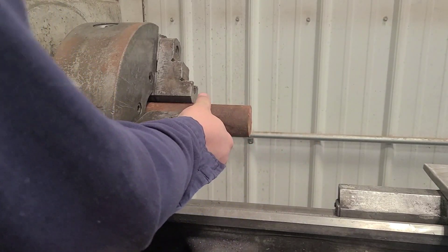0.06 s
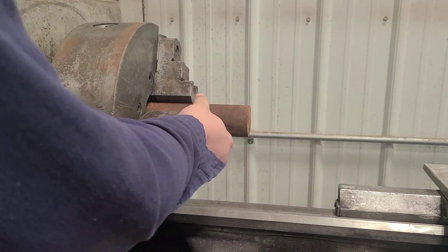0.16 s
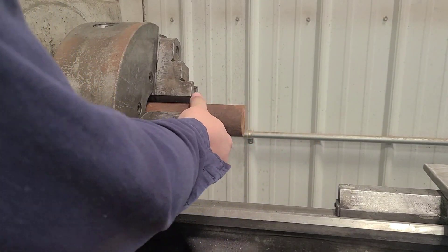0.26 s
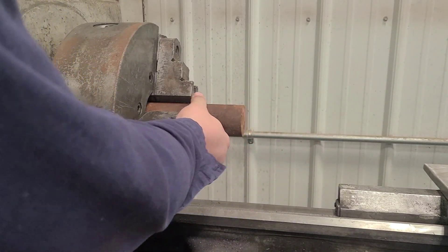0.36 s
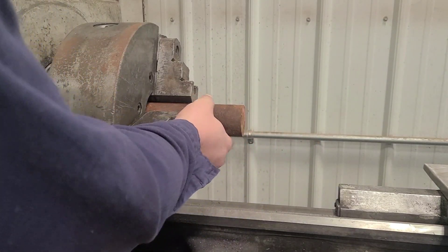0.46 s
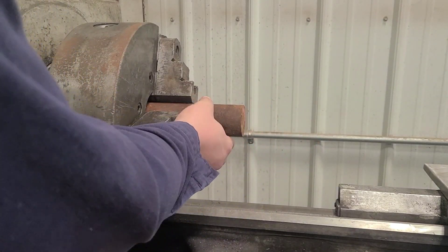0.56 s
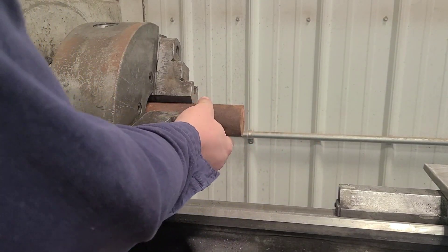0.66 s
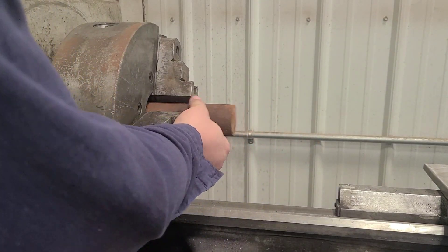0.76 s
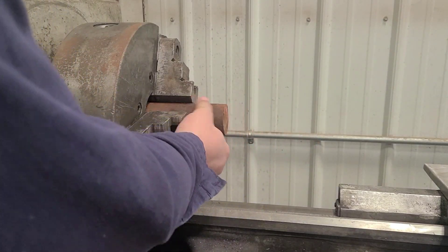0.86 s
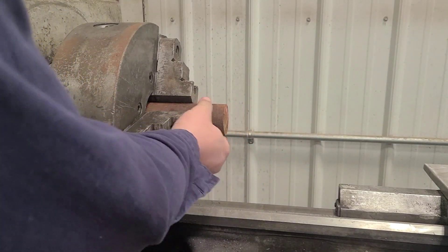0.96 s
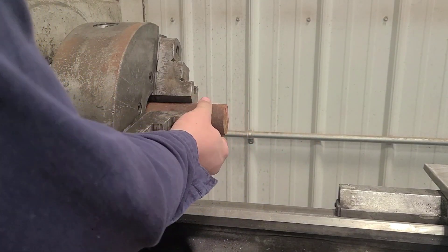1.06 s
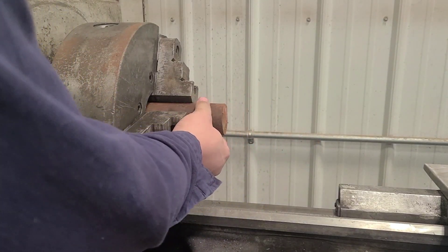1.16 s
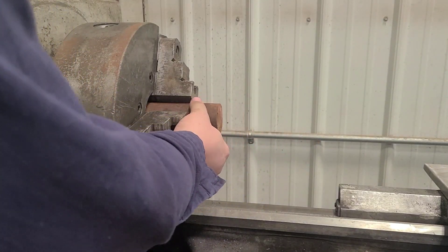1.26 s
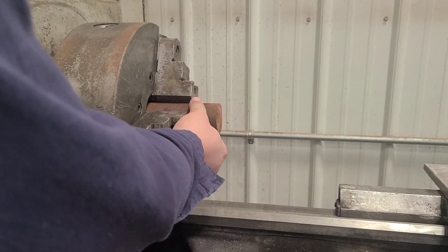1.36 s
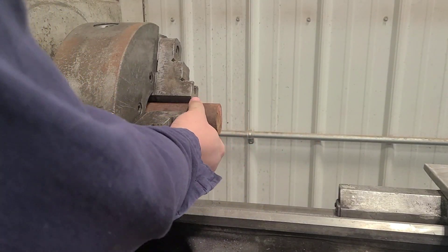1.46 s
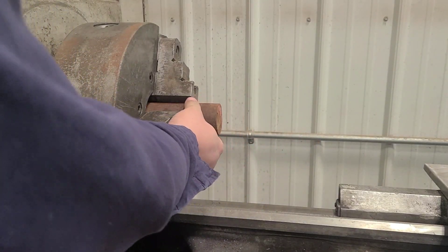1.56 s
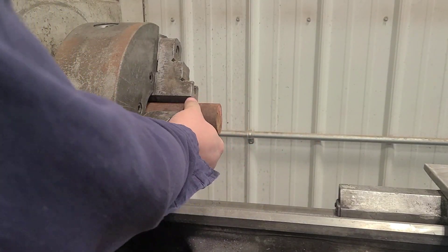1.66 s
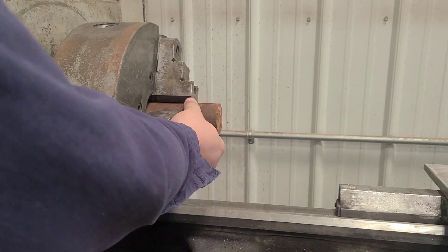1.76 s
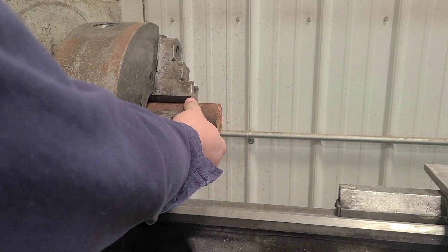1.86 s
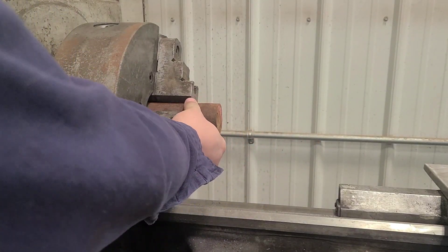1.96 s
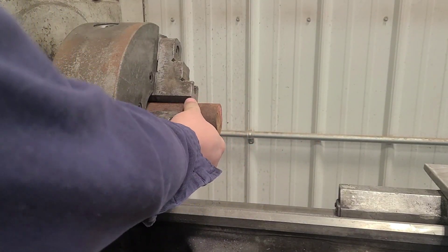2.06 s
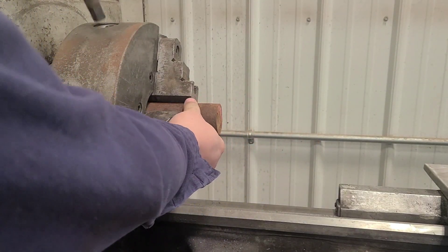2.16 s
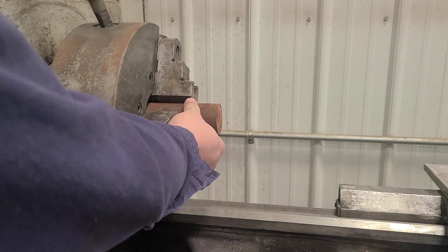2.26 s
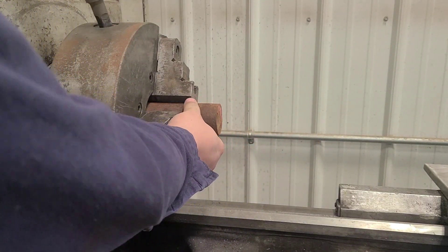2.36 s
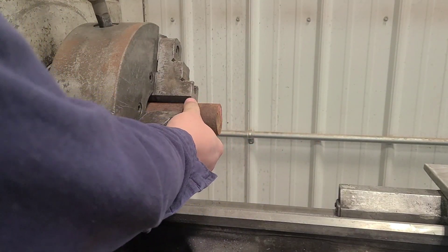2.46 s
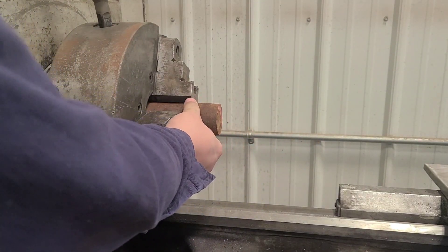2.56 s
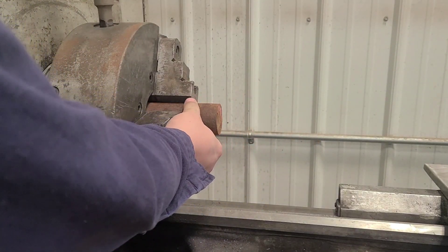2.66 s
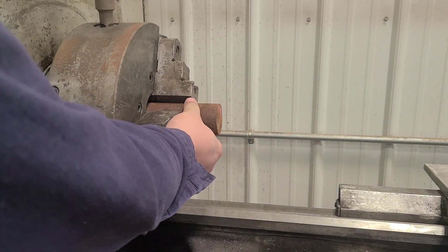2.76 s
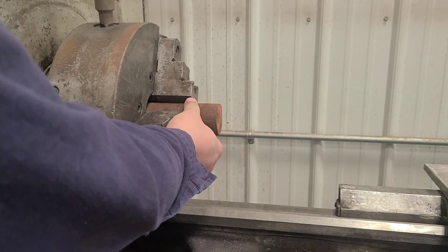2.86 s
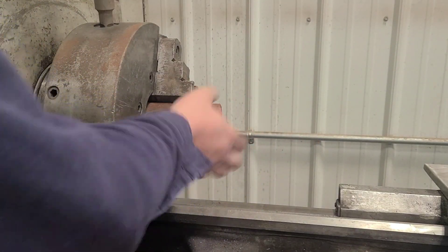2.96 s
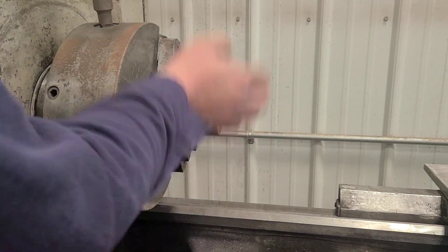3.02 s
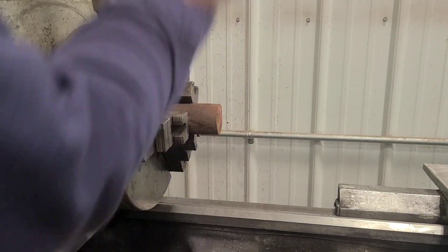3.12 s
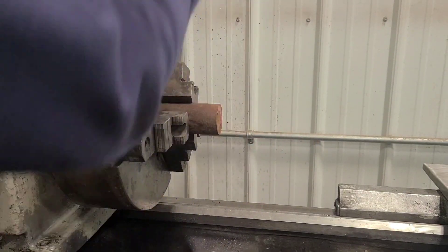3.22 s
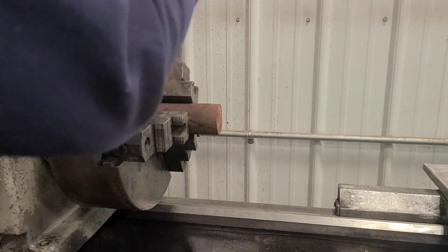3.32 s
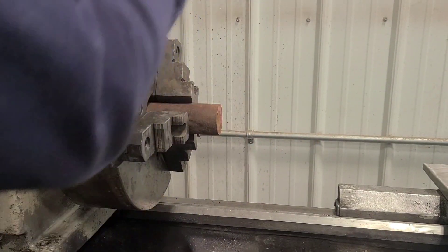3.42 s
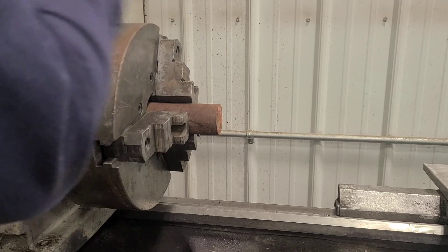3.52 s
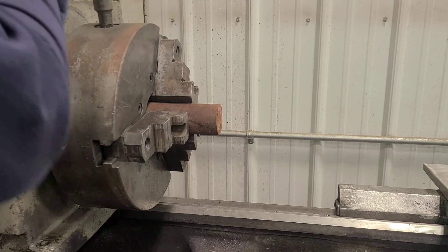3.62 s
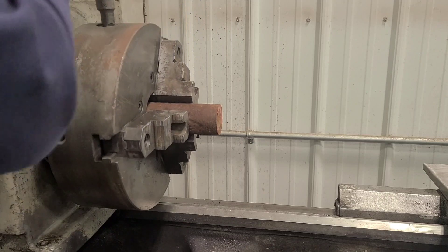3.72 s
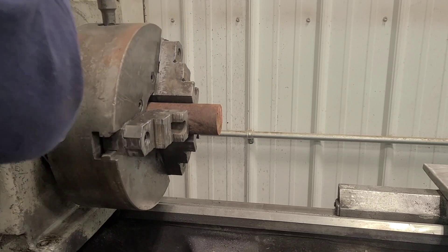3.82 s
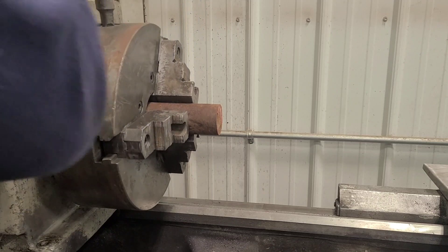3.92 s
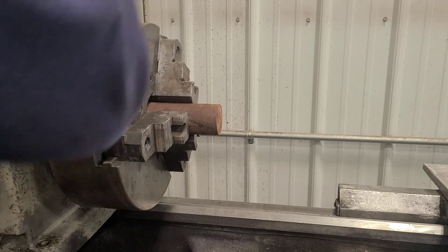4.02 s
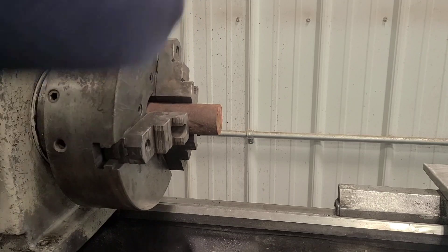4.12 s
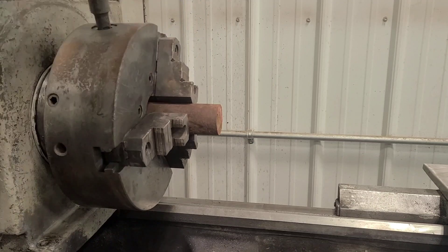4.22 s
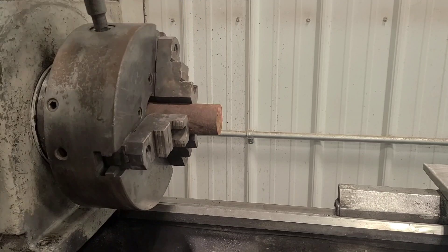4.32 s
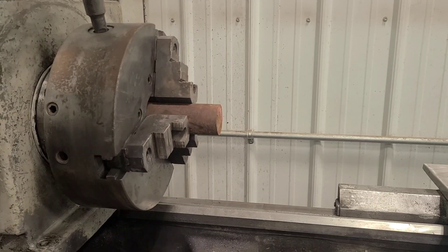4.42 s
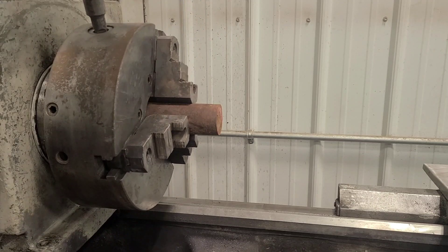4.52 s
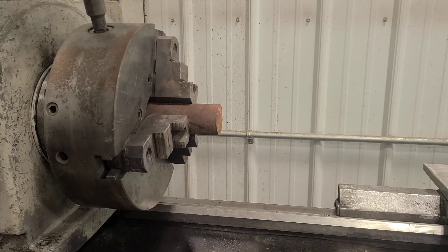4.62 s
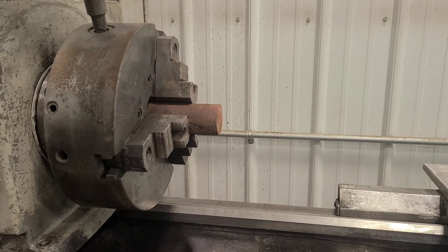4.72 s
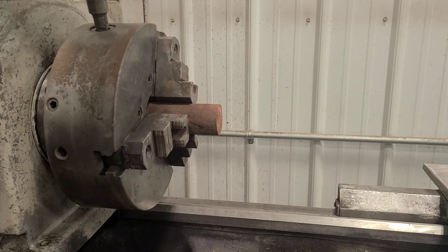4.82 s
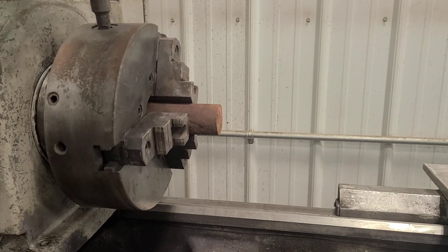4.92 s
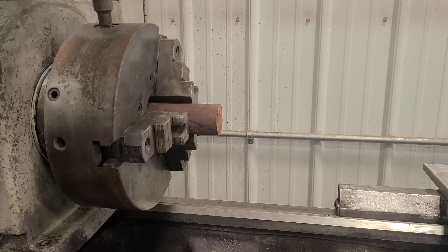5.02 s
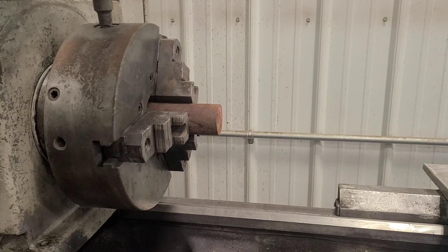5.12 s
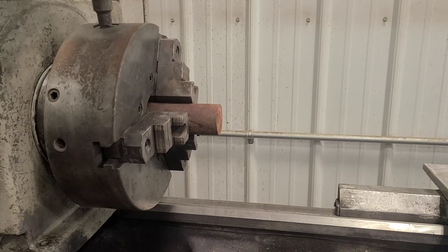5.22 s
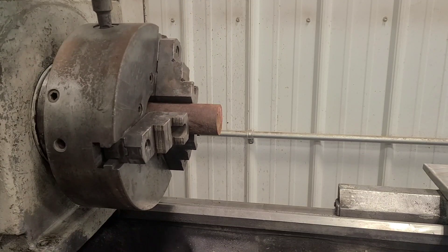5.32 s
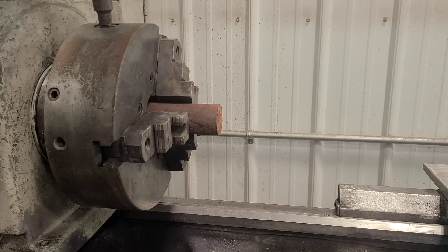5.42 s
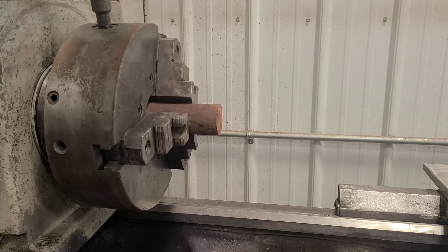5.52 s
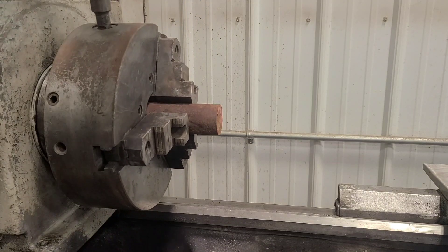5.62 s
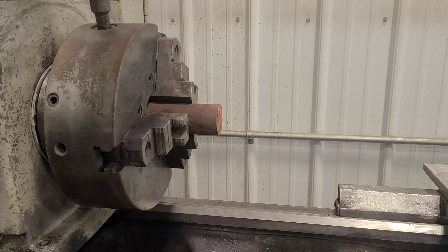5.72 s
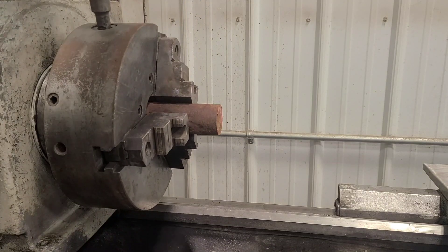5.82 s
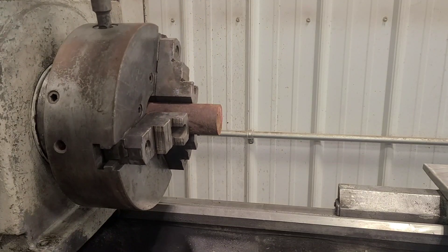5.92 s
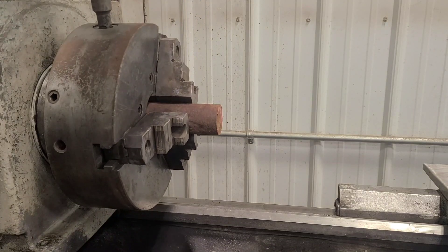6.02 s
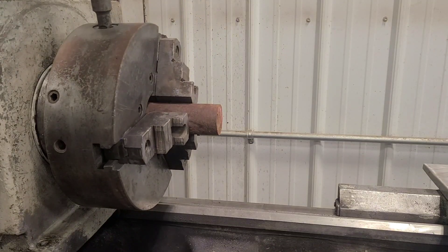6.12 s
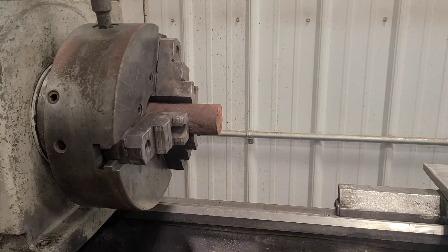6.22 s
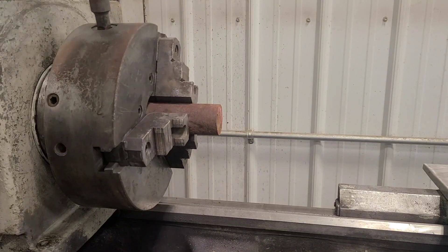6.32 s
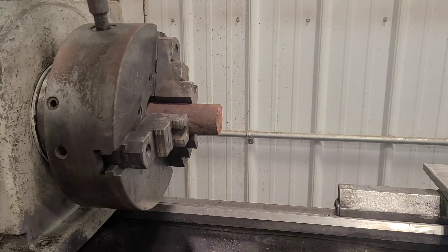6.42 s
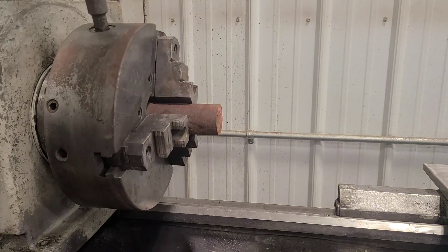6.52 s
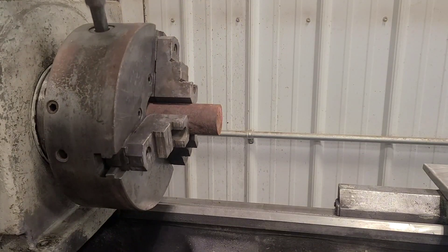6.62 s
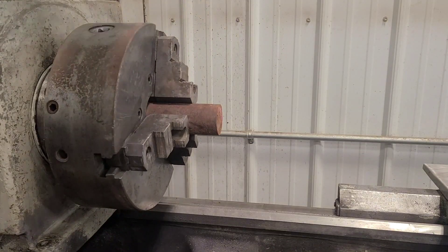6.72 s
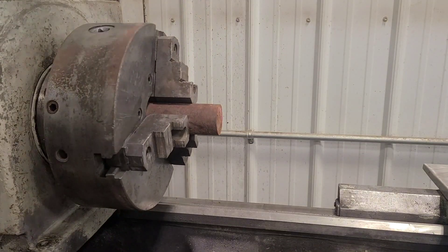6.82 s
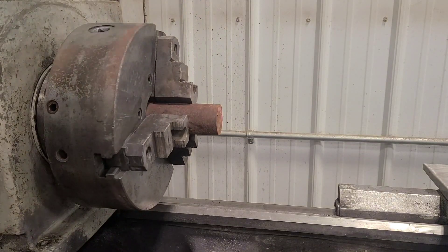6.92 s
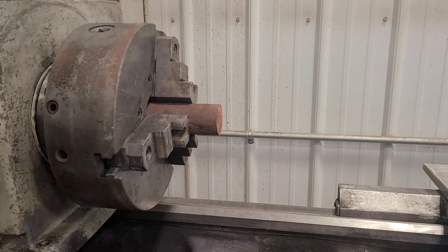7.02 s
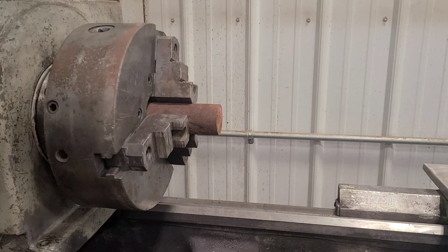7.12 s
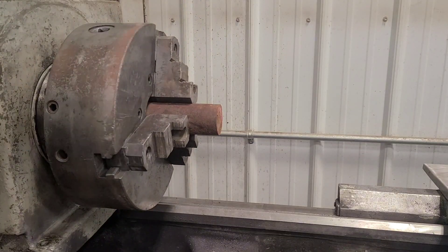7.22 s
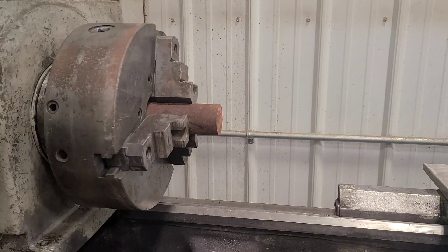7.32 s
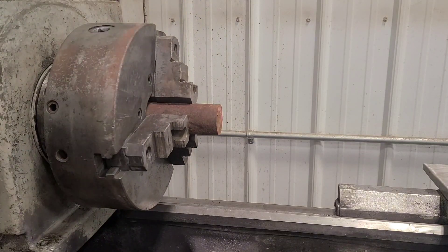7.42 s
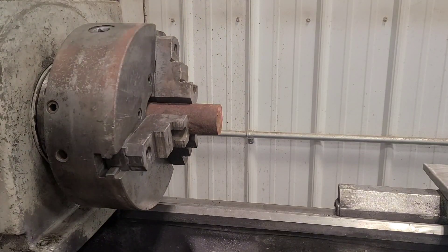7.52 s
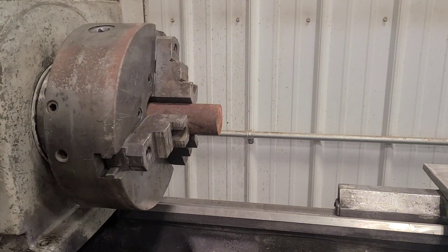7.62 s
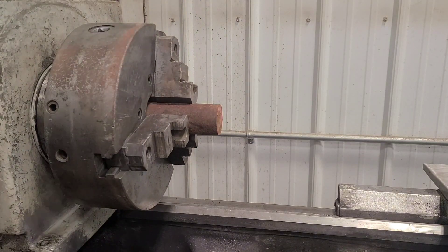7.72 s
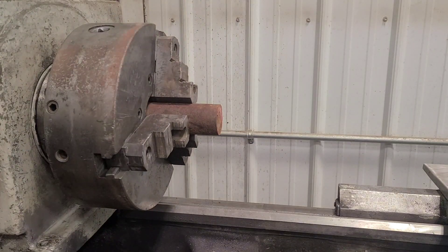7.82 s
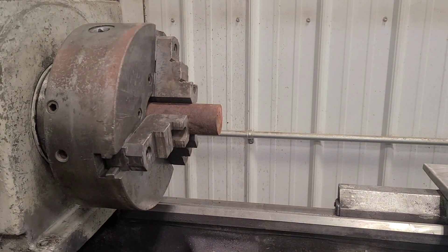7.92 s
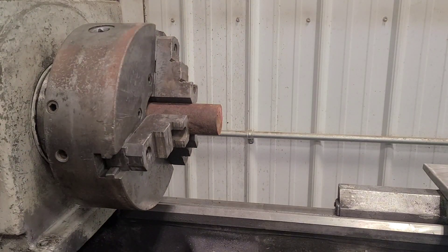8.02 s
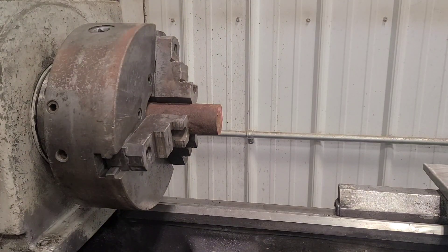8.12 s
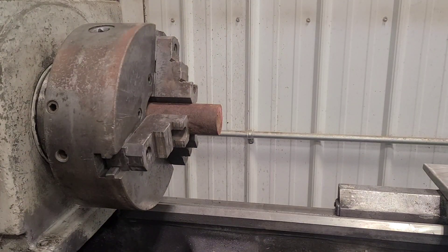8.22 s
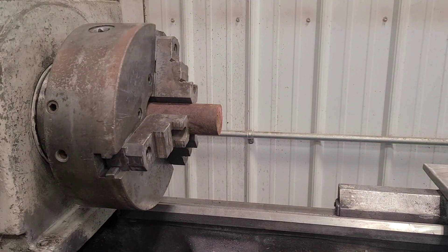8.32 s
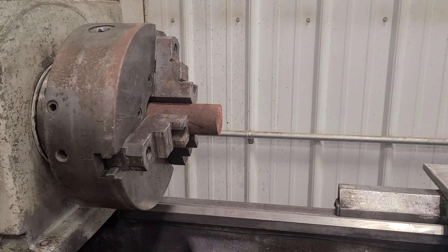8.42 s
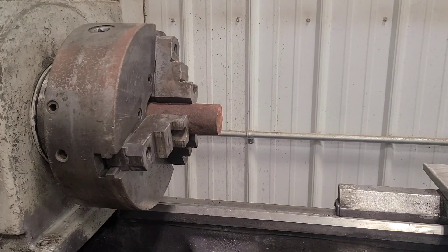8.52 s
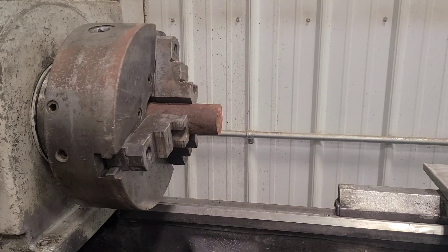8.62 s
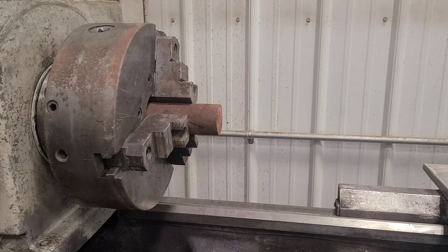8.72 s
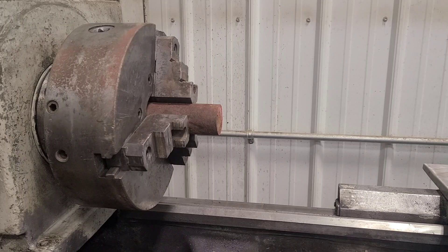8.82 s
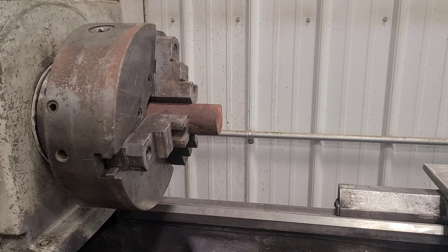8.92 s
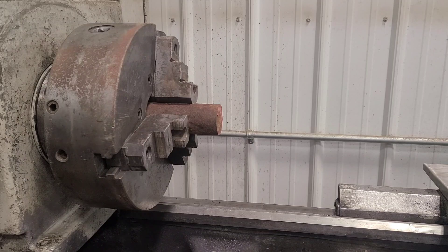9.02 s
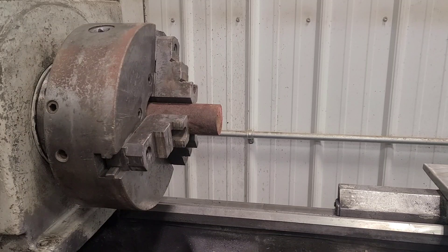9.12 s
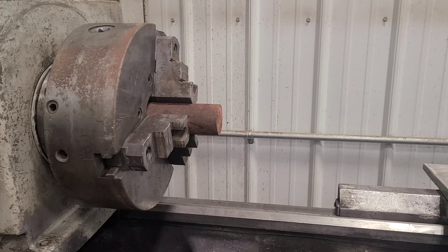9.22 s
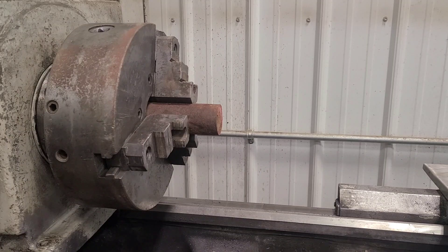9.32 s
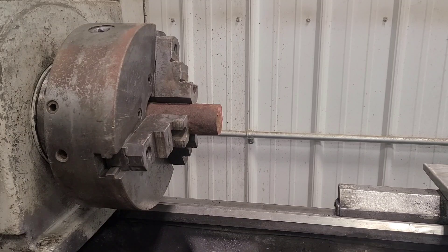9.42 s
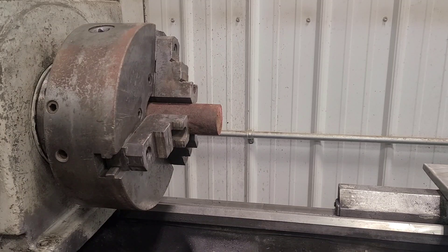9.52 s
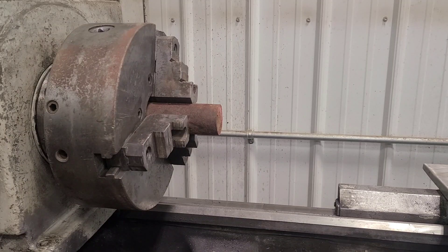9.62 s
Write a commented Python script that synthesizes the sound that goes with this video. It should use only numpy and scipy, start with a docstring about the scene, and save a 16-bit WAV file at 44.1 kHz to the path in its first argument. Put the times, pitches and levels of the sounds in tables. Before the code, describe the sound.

A steel bar clanks into a lathe chuck, clunks and small clicks follow as a key is worked, then a bright metallic crash on a tray.

```python
"""A low hum and the hiss of two microphone ports come first, with soft handling scuffs, in a tin-walled workshop.
Then a steel bar is slid into a lathe chuck, the jaws are tightened with a key, and the key drops on a steel tray;
near 9 s come duller knocks. Each blow is a crack of banded noise, dying sines for the struck part and a rough wash.
Jolts set the lathe bed humming, puffs of patchy noise come around some blows or like rustling sleeves elsewhere,
and sparse random taps make the room answer."""
import sys
import numpy as np
from scipy import signal
from scipy.fft import rfft, irfft, next_fast_len
from scipy.io import wavfile
from scipy.ndimage import uniform_filter1d

SR = 44100
rng = np.random.default_rng(int(sys.argv[2]) if len(sys.argv) > 2 else 0)


def bounce(signal):
    """Save signal as a 16-bit WAV file at the path given by the first command-line argument."""
    frames = np.transpose(np.atleast_2d(signal))
    limited = np.clip(frames, -1, 1)
    pcm = np.round(limited * 32767).astype(np.int16)
    wavfile.write(sys.argv[1], SR, pcm)


N = 426447

# How alike sound from all around is at the two ports. Each row: frequency in Hz, likeness from 0 to 1.
PORT_LIKENESS = [(30, 0.85), (200, 1), (700, 0.15), (2500, 0.17), (15000, 0.065)]
# Ringing modes of the chuck. Each row: frequency in Hz, relative level in dB, t60 in seconds.
CHUCK_MODES = [(460, -1, 0.23), (587, -7, 0.23), (867, -5, 0.077), (1007, 2, 0.037), (1510, 2, 0.018),
               (1683, 8, 0.03), (2060, -11, 0.11), (2312, 11.5, 0.033), (2460, 2, 0.33), (2550, 15, 0.03),
               (2630, -6, 0.34), (2860, 11.5, 0.033), (4216, 6.5, 0.04), (6000, 0, 0.035),
               (6450, -4, 0.098), (6920, 4.5, 0.066), (8620, -4.5, 0.038), (9400, -17, 0.028),
               (11900, -15, 0.037)]


def gain_of(db):
    """Amplitude factor of a level in dB."""
    return 10 ** (np.asarray(db) / 20)


def evened(x):
    """Scale a signal to an rms of 1."""
    return x / np.sqrt(np.mean(x ** 2) + 1e-20)


def read(points, hz):
    """Read a curve of (Hz, value) points along a logarithmic frequency axis."""
    f, value = np.transpose(points)
    return np.interp(np.log(hz + 1), np.log(f + 1), value)


def add(mix, s, sound):
    """Lay a sound into the mix at s seconds, cut at the end of the mix."""
    part = mix[..., round(s * SR):][..., :sound.shape[-1]]
    part += sound[..., :part.shape[-1]]


def band(x, low_hz, high_hz):
    """Keep one band of frequencies."""
    edges = [low_hz, min(high_hz, SR / 2.2)]
    return signal.sosfilt(signal.butter(4, edges, "bandpass", fs=SR, output="sos"), x)


def ports(x, lag_s, lean=0):
    """Sound reaches the right port a little later than the left; lean gives struck steel another colour there."""
    # How much louder struck steel is in the left port. Each row: frequency in Hz, difference in dB.
    left_lean = [(100, -5.5), (1300, 0), (2400, 2), (4400, 8.5), (8100, 7), (12000, 4.5)]
    size = next_fast_len(x.shape[1] + 64)
    hz = np.fft.rfftfreq(size, 1 / SR)
    tilt = gain_of(lean * read(left_lean, hz) / 2)
    right = np.exp(-2j * np.pi * hz * lag_s) / tilt
    return irfft(rfft(x, size) * [tilt, right], size)[:, :x.shape[1]]


def unlike(left, other, likeness):
    """Mix two independent spectra so that the ports are only partly alike."""
    return np.array([left, likeness * left + np.sqrt(1 - likeness ** 2) * other])


def noise(spectrum, patchy_db, size, likeness):
    """Random short-time spectra with drifting patches of level, partly alike in both ports."""
    frames, hz = N // (size // 4) + 5, np.fft.rfftfreq(size, 1 / SR)
    a, b, c, d, patches = rng.standard_normal((frames, len(hz), 5)).T
    patches = uniform_filter1d(patches, size=9, axis=0)
    patches = evened(uniform_filter1d(patches, size=9, axis=1))
    same = np.clip(likeness * read(PORT_LIKENESS, hz), -1, 1)[:, None]
    z = unlike(a + 1j * b, c + 1j * d, same)
    z *= gain_of(read(spectrum, hz)[:, None] + patchy_db * patches)
    return signal.istft(z, nperseg=size, noverlap=size * 3 // 4)[1][:, :N]


def air():
    """The still air of the workshop and the hiss of the microphone: steady shaped noise."""
    # Colour of the air and hiss. Each row: frequency in Hz, relative level in dB per Hz.
    air_colour = [(20, -21.5), (43, -12.5), (80, -5), (125, -26), (200, -26), (440, -29), (900, -31.5),
                  (2000, -34.5), (3000, -34.5), (6600, -42.5), (7400, -58), (9500, -51.5), (11800, -45.5),
                  (16000, -48.5)]
    level_db = -67  # of the part between 130 and 18000 Hz
    x = noise(air_colour, 0.12, size=2048, likeness=0.85)
    return gain_of(level_db) * x / band(x, 130, 18000).std()


def wavering(hz, width_hz):
    """A steady tone plus a narrow line of noise on it: height and phase wander."""
    r = np.exp(-np.pi * width_hz / SR)
    push = rng.standard_normal(N) + 1j * rng.standard_normal(N)
    slow = signal.lfilter([1], [1, -r], push)
    carrier = np.exp(2j * np.pi * hz * np.arange(N) / SR)
    return ((1 + 0.54 * slow / slow.std()) * carrier).real


def hum():
    """A low hum swells and fades, with fainter wavering tones above it, the highest a blurred narrow band."""
    # Swell of the hum. Each row: time in seconds, level in dB.
    swell = [(0.0, -52), (0.29, -61.5), (1.21, -52.5), (2.85, -59.5), (3.068, -59), (4.28, -66.5),
             (4.39, -60), (5.3, -60), (5.38, -90), (5.63, -60.5), (6.68, -57), (6.7, -68), (8.1, -62),
             (9.67, -67.5)]
    # Faint wavering tones. Each row: frequency in Hz, level in dB, line width in Hz.
    faint_tones = [(202, -81, 4.1), (117.6, -76.5, 2.3), (2590, -86.5, 71)]
    hum_hz, width_hz = 76.4, 2.2
    s, db = np.transpose(swell)
    out = gain_of(np.interp(np.arange(N) / SR, s, db)) * evened(wavering(hum_hz, width_hz))
    for hz, db, width in faint_tones:
        out = out + gain_of(db) * evened(wavering(hz, width))
    return out


def scuffs():
    """Heavy parts scuff and bump dully in handling: humps of gritty banded noise."""
    # Each row: peak of the hump in seconds, level in dB, seconds to fade to about half, centre in Hz.
    scuff_list = [(.08, -60.5, 0.076, 213), (0.461, -62.5, 0.062, 324), (1.061, -55, 0.1, 247),
                  (1.423, -64, 0.09, 220), (2.43, -38.5, 0.038, 463), (3.412, -54.5, 0.045, 284),
                  (3.908, -46.5, 0.049, 400), (4.041, -52.5, 0.033, 343), (4.154, -66, 0.044, 2260),
                  (4.417, -61.5, 0.13, 480), (4.422, -69, 0.23, 2170), (4.941, -53.5, 0.032, 358),
                  (5.047, -58.5, 0.036, 360), (5.421, -64, 0.035, 322), (5.708, -51, 0.056, 372),
                  (6.074, -63.5, 0.038, 327), (5.905, -66, 0.12, 2770), (5.992, -61.5, 0.079, 3380),
                  (6.484, -58, 0.051, 345), (6.887, -50.5, 0.03, 1220), (8.051, -40, 0.01, 556),
                  (9.141, -54.5, 0.011, 204)]
    rise_speed = 1.85  # times faster than the fade
    out = np.zeros((2, N))
    for s, db, length, hz in scuff_list:
        a, b, grit = rng.standard_normal((3, SR // 2))
        u = (np.arange(SR // 2) / SR - 1 / 4) / length
        hump = np.exp(-(0.85 * u * np.where(u < 0, rise_speed, 1)) ** 2)
        rough = np.array([a, a + 0.23 * b]) * gain_of(3.4 * grit)
        scuff = gain_of(db) * hump * evened(band(rough, hz / 1.49, hz * 1.324))
        early = max(round((1 / 4 - s) * SR), 0)  # samples that would fall before the start
        add(out, max(s - 1 / 4, 0), scuff[:, early:])
    return out


def ringing(modes, level_db, favoured_hz, spread_octaves, split_hz, apart, rise_cycles, wander):
    """Dying sines in beating pairs, strongest near the pitch the blow favours, with another phase in each port.

    Phases stray by about wander turns in every 10 ms, which roughens the ring."""
    silent_db, twin_db, twin_lasts = -95, -9, .22  # the twin is weaker but lasts this share longer
    hz, db, t60 = np.transpose(modes + modes)
    luck, phase, side = rng.standard_normal((3, len(hz)))
    twin = np.arange(len(hz)) >= len(modes)
    off_pitch = np.log2(hz / favoured_hz) / spread_octaves
    db = level_db + db + 0.73 * luck + twin_db * twin - 10 * off_pitch ** 2
    hz = hz + split_hz * twin * (1 + 0.24 * side)
    t60 = t60 * (1 + twin_lasts * twin)
    steps = wander * np.cumsum(rng.standard_normal((len(hz), 101)), axis=1)
    out = np.zeros((2, SR))
    for f, d, t6, p, sd, step in zip(hz, db, t60, phase, side, steps):
        t = np.arange(int(SR * np.clip((d - silent_db) / 60 * t6, 0, 1))) / SR
        turns = f * t + p + np.interp(t * 100, np.arange(101), step)
        attack = np.minimum(t * f / rise_cycles, 1)
        mode = gain_of(d) * attack * np.exp(2j * np.pi * turns - np.log(1000) * t / t6)
        out[:, :len(t)] += [mode.imag, (mode * np.exp(2j * np.pi * apart * sd)).imag]
    return out


def crack(burst, knock_db, clank_db, tick_db, t60, hard):
    """The instant of contact: noise in a low, a middle and a high band, duller for a light touch."""
    t = np.arange(len(burst)) / SR
    thud_filter = signal.butter(1, 1000, fs=SR)  # the knock falls off above this
    dull_filter = signal.butter(1, 3450 * (0.072 + 0.23 * hard), fs=SR)
    thud = evened(signal.lfilter(*thud_filter, band(burst, 460, 3600)))
    clank = evened(signal.lfilter(*dull_filter, band(burst, 1150, 6800)))
    tick = evened(band(burst, 6800, 15500))
    fall = gain_of(-60 * t / max(t60, .005)) * np.minimum(t / 0.0029, 1)
    return fall * (gain_of(knock_db) * thud + gain_of(clank_db) * (clank + gain_of(tick_db) * tick))


def blows(table, modes, apart, tick_db, wash_db, wash_t60, spread_octaves, split_hz, wander, lag_s, wash_s=0.5):
    """Each blow cracks, rings the modes of the part and leaves the dense rough wash of castings and sheet."""
    size = int(wash_s * SR)
    out, t = np.zeros((2, N)), np.arange(size) / SR
    # countless weak modes: an uneven spectrum shared by all blows on the part
    crowd = gain_of(2.0 * evened(uniform_filter1d(rng.standard_normal(size // 2 + 1), size=9)))
    for s, ring, knock, clank, hz, t60 in table:
        burst, left, right = rng.standard_normal((3, size))
        hard = np.clip((clank + 62.4) / 28, .07, 1)  # a light touch stirs few modes, a hard blow many
        add(out, s, crack(burst[:SR // 4], knock, clank, tick_db, t60, hard))
        wash = irfft(rfft([left, left + 1.5 * right]) * crowd)
        wash = evened(band(wash, 900, 5600)) * np.minimum(t / .015, 1)
        add(out, s, gain_of(clank + wash_db - 60 * t / wash_t60) * wash)
        add(out, s, ringing(modes, ring, hz, spread_octaves * hard, split_hz, apart, rise_cycles=2.2, wander=wander))
    return ports(out, lag_s, lean=1)


def jaw():
    """Blows on a chuck jaw: a few modes ring briefly."""
    # Each row: start in seconds, ring, knock and clank in dB, favoured mode in Hz, crack t60 in seconds.
    jaw_hits = [(.721, -37.5, -33.5, -40, 2500, 0.2), (.751, -49, -38, -26.5, 4500, 0.034),
                (.8, -53, -44, -47, 2500, 0.067)]
    # Ringing modes of the jaw. Each row: frequency in Hz, relative level in dB, t60 in seconds.
    jaw_modes = [(740, -3, 0.14), (1890, -16, 0.29), (2390, -8, 0.33), (3500, -14, 0.52), (4690, -14, 0.28),
                 (6150, -6, 0.21), (7810, -21, 0.2)]
    return blows(jaw_hits, jaw_modes, apart=0.17, tick_db=-19.0, wash_db=-21, wash_t60=0.53,
                 spread_octaves=6.8, split_hz=36, wander=0.26, lag_s=0.00025)


def puffs():
    """Short smooth puffs of patchy, mostly high noise, some around blows, others like rustling sleeves."""
    # Each row: middle in seconds, level in dB, length in seconds.
    puff_list = [(0.928, -55, 0.062), (2.847, -63, 0.074), (3.096, -65.5, 0.044), (3.39, -71, 0.28),
                 (4.44, -66.5, 0.52), (4.662, -69, 0.17), (5.09, -67, 0.15), (5.253, -70.5, 0.24),
                 (5.666, -68.5, 0.2), (5.99, -65, 0.35), (6.387, -72, 0.42), (6.88, -68, 0.59),
                 (7.069, -61, 0.087), (7.366, -65, 0.096), (7.467, -68.5, 0.075), (8.884, -67, 0.85)]
    # Colour of the puffs. Each row: frequency in Hz, relative level in dB per Hz.
    puff_colour = [(1500, -29), (3000, -4), (5000, -2), (7000, 0.5), (9000, -8.5), (12000, -3.5),
                   (15000, -1), (16000, -5.5)]
    t = np.arange(N) / SR
    swells = sum(gain_of(db) * np.exp(-(3.3 * (t - s) / length) ** 2) for s, db, length in puff_list)
    return swells * evened(noise(puff_colour, 1.6, size=256, likeness=0.3))


def bar():
    """Blows on the steel bar: its modes ring clear, with little wander of phase."""
    # Each row: start in seconds, ring, knock and clank in dB, favoured mode in Hz, crack t60 in seconds.
    bar_hits = [(.897, -64, -43.5, -64, 980, 0.064), (.923, -33.5, -15.5, -20, 2380, 0.024),
                (.954, -43, -37, -27, 7100, 0.031)]
    # Ringing modes of the bar. Each row: frequency in Hz, relative level in dB, t60 in seconds.
    bar_modes = [(520, 7, .09), (1012, -16, .25), (1733, -23, .35), (2530, -15, .6), (2803, 3.5, .58),
                 (3550, -13, .5), (4085, -13, .55), (4935, -15, .55), (6080, -20, .3), (6400, -14, .45),
                 (7680, -17, .5), (8100, -15, .45), (9740, -18, .3), (10200, -21, .25), (11660, -18, .15),
                 (12440, -21, .22), (13870, -26, .2)]
    return blows(bar_hits, bar_modes, apart=.08, tick_db=-22.0, wash_db=-23.5, wash_t60=0.58,
                 spread_octaves=19.0, split_hz=11.5, wander=0.06, lag_s=0.00021)


def bed():
    """The heavy lathe bed hums low after each jolt."""
    # Jolts that sway the bed. Each row: start in seconds, level in dB.
    jolts = [(0.924, -57.5), (2.402, -33.5), (2.518, -32), (2.847, -43), (2.871, -33), (2.938, -42),
             (2.948, -27), (3.081, -39.5), (3.209, -44), (3.708, -55), (3.901, -60), (4.2, -44),
             (4.366, -51), (4.491, -46), (4.618, -41.5), (4.731, -50), (5.689, -63), (6.845, -64.5),
             (8.059, -54), (8.109, -43.5)]
    # Ringing modes of the bed. Each row: frequency in Hz, relative level in dB, t60 in seconds.
    bed_modes = [(126, -4, .35), (160, 0, .55), (186, -7, .4), (207, -8, .7)]
    out = np.zeros((2, N))
    for s, db in jolts:
        add(out, s, ringing(bed_modes, db, favoured_hz=170, spread_octaves=4.8, split_hz=8.8,
                            apart=0.099, rise_cycles=0.57, wander=0.073))
    return out


def chuck():
    """Blows on the chuck: heavily damped modes; light touches drag and hard blows snap."""
    # Each row: start in seconds, ring, knock and clank in dB, favoured mode in Hz.
    chuck_hits = [(2.396, -40, -26, -48, 960), (2.404, -36.5, -15, -20, 2660),
                  (2.458, -36.5, -20.5, -21.5, 7100), (2.519, -41.5, -20.5, -13.5, 6100),
                  (2.526, -58, -25, -32, 3000), (2.848, -56, -39, -51, 990), (2.871, -61, -63, -57, 921),
                  (2.934, -41.5, -16.5, -19.5, 6100), (2.943, -45.5, -35, -23, 2660),
                  (2.952, -46.5, -53, -62, 2780), (3.267, -43, -50, -57.5, 1007),
                  (3.514, -46, -55, -65, 1007), (3.834, -52, -50.5, -64, 1007),
                  (3.901, -57, -50, -65, 1000), (3.917, -41, -44, -50.5, 970),
                  (4.027, -51, -47.5, -60, 1007), (4.125, -56, -44, -54.5, 1520),
                  (4.197, -73, -46, -58, 2200), (4.36, -84, -46.5, -58, 2190),
                  (4.491, -53, -65, -56.5, 880), (4.617, -51.5, -32, -30, 2720),
                  (4.629, -61, -31.5, -62, 1000), (5.034, -53, -50.5, -61, 805),
                  (5.689, -53, -41, -60, 1070), (5.73, -62.5, -45.5, -50.5, 1380),
                  (6.058, -68, -53, -45, 1750), (6.36, -77, -61, -50.5, 4340),
                  (6.544, -63, -45.5, -57, 2060), (6.846, -50.5, -39, -34.5, 2490),
                  (6.917, -68, -42, -51, 982)]
    # How long the crack lasts. Each row: clank in dB, crack t60 in seconds.
    crack_length = [(-74, 0.046), (-17.5, 0.022)]
    table = [(*row, np.interp(row[3], *np.transpose(crack_length))) for row in chuck_hits]
    return blows(table, CHUCK_MODES, apart=0.27, tick_db=-29.0, wash_db=-34, wash_t60=0.68,
                 spread_octaves=2.02, split_hz=38.0, wander=0.081, lag_s=0.00019)


def snaps():
    """Sharp snaps of edge on edge: a few dying cycles each."""
    # Each row: start in seconds, level in dB, frequency in Hz, t60 in seconds.
    snap_list = [(2.4044, -11.5, 2630, .011), (2.52, -23.5, 6020, .015), (2.526, -36, 2290, 0.017),
                 (2.943, -29, 4300, 0.022), (4.619, -28, 6350, 0.013), (4.6185, -24, 2850, 0.017),
                 (4.298, -51, 4300, .004), (4.571, -41, 2300, .006), (5.382, -50, 2000, .004),
                 (5.652, -38, 2500, .005), (5.762, -41, 1490, .008), (6.059, -28.5, 3740, 0.0025),
                 (6.232, -39, 1900, 0.0035), (6.35, -45, 2000, 0.0043), (6.452, -43, 3500, 0.003),
                 (6.848, -44, 2760, 0.016), (8.164, -12, 3180, 0.027), (9.0545, -22, 2350, 0.0095)]
    out, t = np.zeros(N), np.arange(SR // 10) / SR
    for s, db, hz, t60 in snap_list:
        fall = gain_of(db - 60 * t / t60) * np.minimum(t * hz / 0.99, 1)
        add(out, s, fall * np.sin(2 * np.pi * (hz * t + rng.random())))
    return out


def slides():
    """The key slides in its socket, louder until it seats: swelling grit stirs the modes of the chuck."""
    # Each row: end of the swell in seconds, peak in dB, swell time constant in seconds, favoured mode in Hz.
    slide_list = [(2.525, -24, 0.0087, 2400), (2.839, -48, 0.017, 6470), (2.931, -42, 0.0074, 4020),
                  (4.603, -61, 0.017, 6500), (6.85, -41, 0.025, 2460), (6.907, -48.5, 0.026, 2800)]
    out, t = np.zeros(N), np.arange(SR // 10) / SR
    damping = gain_of(-60 * np.arange(SR // 4) / SR / 0.028)
    for s, db, length, hz in slide_list:
        unsteady = gain_of(3.7 * rng.standard_normal(len(t)))
        grit = rng.standard_normal(len(t)) * unsteady * np.exp((t - 1 / 10) / length)
        body = ringing(CHUCK_MODES, -48, hz, spread_octaves=1.0, split_hz=27.5,
                       apart=0, rise_cycles=0.78, wander=0.14)
        rub = signal.fftconvolve(grit, body[0, :SR // 4] * damping)
        add(out, s - 1 / 10, gain_of(db) * rub / abs(rub).max())
    return out


def snaps_and_slides():
    """Snaps of edge on edge and slides of the key reach both ports with the same lag and lean."""
    out = snaps() + slides()
    return ports(np.array([out, out]), .00021, lean=0.87)


def rattle():
    """While the key is worked, loose parts tick at random: broad clicks, a few of them larger."""
    start_s, end_s, ticks_per_s = 3.5, 7.5, 60
    base_db = -63  # before the random boost and the band filter
    t = np.arange(N) / SR
    boost_db = 5.9 * np.minimum(rng.exponential(1, N), 3)
    ticking = (rng.random(N) < ticks_per_s / SR) * (t > start_s) * (t < end_s)
    size = gain_of(base_db + boost_db) * ticking
    kind, out = rng.integers(0, 8, N), np.zeros(N)
    for k, grain in enumerate(rng.standard_normal((8, 900))):
        click = grain * gain_of(-60 * t[:900] / 0.015)
        out += signal.oaconvolve(size * (kind == k), click)[:N]
    out = band(out, 230, 2850)
    return ports(np.array([out, out]), 0.00017)


def squeaks():
    """Steel squeaks on steel: brief tones that swell and fade, their pitch trembling."""
    # Each row: middle in seconds, level in dB, length in seconds, frequency in Hz.
    squeak_list = [(4.149, -61.5, .07, 2230), (5.79, -64, 0.052, 2170), (6.57, -64, .06, 2130),
                   (6.853, -51, 0.045, 4310)]
    out, t = np.zeros((2, N)), np.arange(SR // 5) / SR
    for s, db, length, hz in squeak_list:
        tremble = evened(uniform_filter1d(rng.standard_normal(len(t)), size=300))
        tone = np.sin(2 * np.pi * np.cumsum(hz * (1 + 0.01 * tremble)) / SR)
        swell = np.exp(-(2.0 * (t - 1 / 10) / length) ** 2)
        add(out, s - 1 / 10, gain_of(db) * tone * swell)
    return out


def tray_and_late_knocks():
    """The key drops on the steel tray, ringing bright; near 9 s come duller knocks of something else."""
    # Each row: start in seconds, ring, knock and clank in dB, favoured mode in Hz, crack t60 in seconds.
    hits = [(8.056, -54.5, -32.5, -35, 4000, 0.74), (8.11, -23, -6.5, -10, 11400, 0.048),
            (8.125, -26.5, -50, -12, 9460, 0.034), (8.14, -29.5, -26, -18.5, 11300, 0.038),
            (8.154, -41, -7, -12.5, 9300, 0.025), (8.163, -35, -22.5, -10, 6200, 0.043),
            (8.975, -90.5, -39.5, -56.5, 3070, 0.019), (9.054, -75.5, -22.5, -27.5, 3010, 0.019),
            (9.134, -79.5, -40.5, -67.5, 2950, 0.032)]
    # Ringing modes of the tray, very faint in the late knocks.
    # Each row: frequency in Hz, relative level in dB, t60 in seconds.
    tray_modes = [(1534, -8, .35), (2126, -19, .8), (2492, -13, .5), (2670, -17, .9), (3180, -16, .8),
                  (3510, -19, 1), (4161, -19, .75), (4490, -13, .7), (5432, -21, .8), (5615, -14, .8),
                  (5950, -7, .65), (6112, -11, .55), (6481, -16, .7), (7040, -15, .35), (7704, 2, .28),
                  (8062, -8, .38), (8242, -12, .4), (8893, -15, .42), (9095, -14, .36), (9450, -14, .3),
                  (9800, -12, .35), (10250, -8, .38), (11520, 3, .32), (11930, 0, .26), (12455, -8, .27),
                  (12830, -5, .28), (13790, -4, .24), (14166, -4, .25), (14670, -13, .16), (15160, -9, .28),
                  (15322, -2, .2)]
    return blows(hits, tray_modes, apart=.2, tick_db=-24.5, wash_db=-27.5, wash_t60=0.97,
                 spread_octaves=7.7, split_hz=65, wander=.31, lag_s=0.0003274, wash_s=1)


def shop(x, likeness):
    """The tin-walled workshop answers: sparse taps of random sign, each band dying at its own speed."""
    # Decay of the workshop. Each row: frequency in Hz, t60 in seconds.
    shop_decay = [(200, 0.55), (530, 0.2), (1390, 0.17), (3680, 0.1), (9700, 0.13)]
    taps = np.zeros((2, SR))
    # one tap somewhere in every 20 samples
    at = np.arange(200, SR - 20, 20) + rng.integers(0, 20, (2, (SR - 201) // 20))
    np.put_along_axis(taps, at, rng.choice([-1., 1.], at.shape), 1)
    hz, t, z = signal.stft(taps, SR, nperseg=256)
    same = np.clip(likeness * read(PORT_LIKENESS, hz), 0, 1)[:, None]
    z = unlike(z[0], z[1], same)
    fall = gain_of(-60 * t / read(shop_decay, hz)[:, None])
    tail = signal.istft(z * fall, SR, nperseg=256)[1]
    return signal.fftconvolve(band(x, 200, SR / 2), tail / np.linalg.norm(tail[0]), axes=1)[:, :N]


def scene():
    """Blows and rattle with the workshop's answer, the bed below, and air, hum, scuffs, puffs and squeaks around."""
    struck = jaw() + bar() + chuck() + snaps_and_slides() + rattle() + tray_and_late_knocks()
    around = air() + hum() + scuffs() + puffs() + squeaks()
    return struck + gain_of(-1.5) * shop(struck, 0.27) + bed() + ports(around, 0.000407)


def record(dry):
    """The band limit of the recorder: a steep low-pass."""
    edge_hz = 15800
    lowpass = signal.firwin(511, edge_hz, window=("kaiser", 9), fs=SR)
    return signal.oaconvolve(dry, lowpass[None], "same")


dry = scene()
out = record(dry)
bounce(out)
```